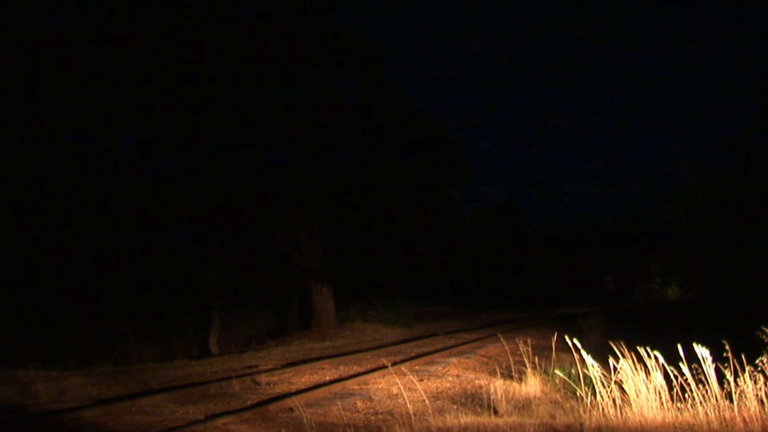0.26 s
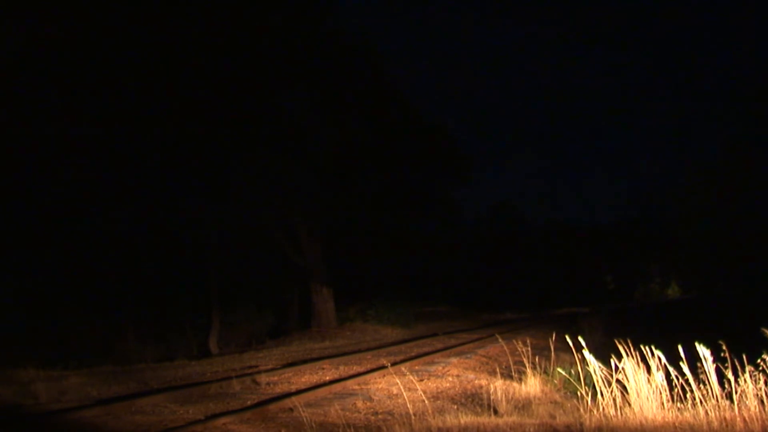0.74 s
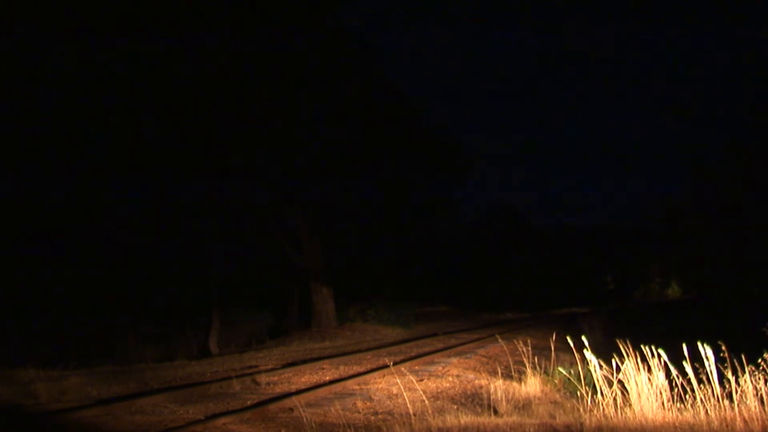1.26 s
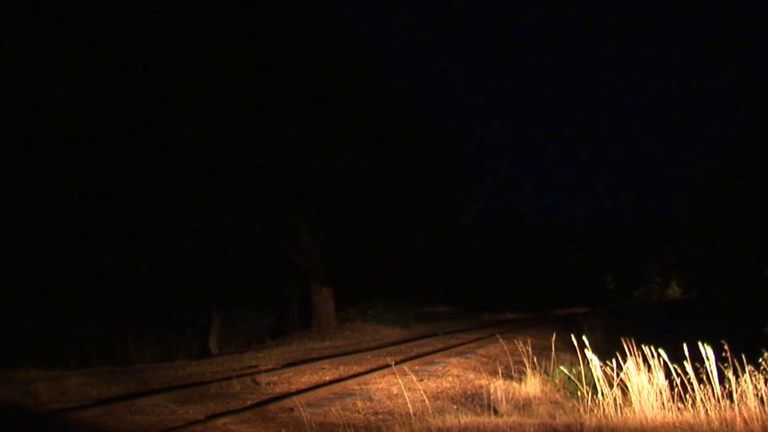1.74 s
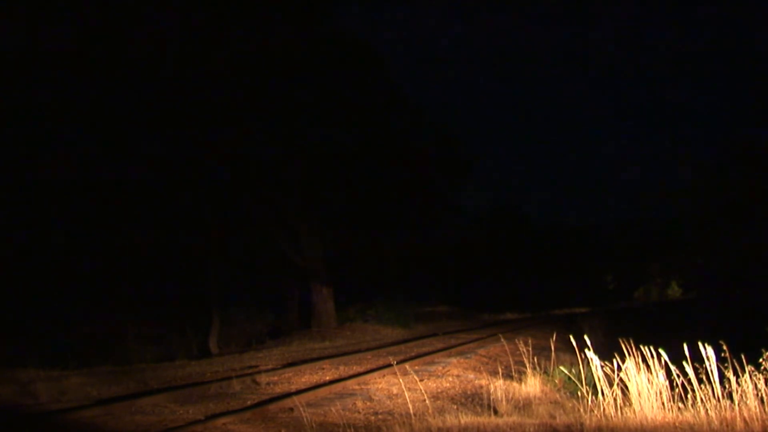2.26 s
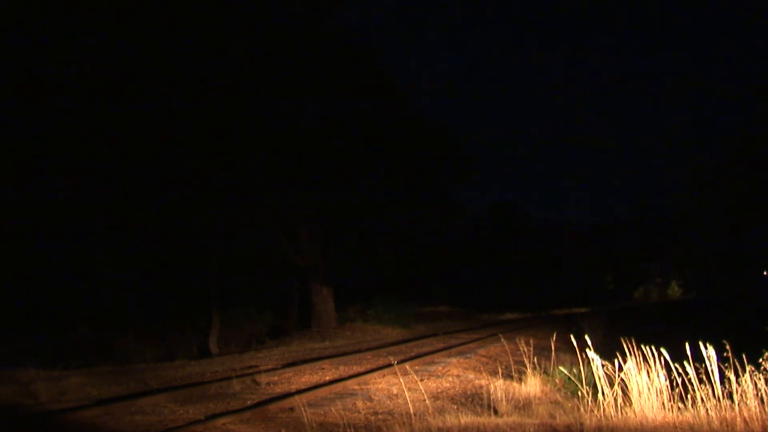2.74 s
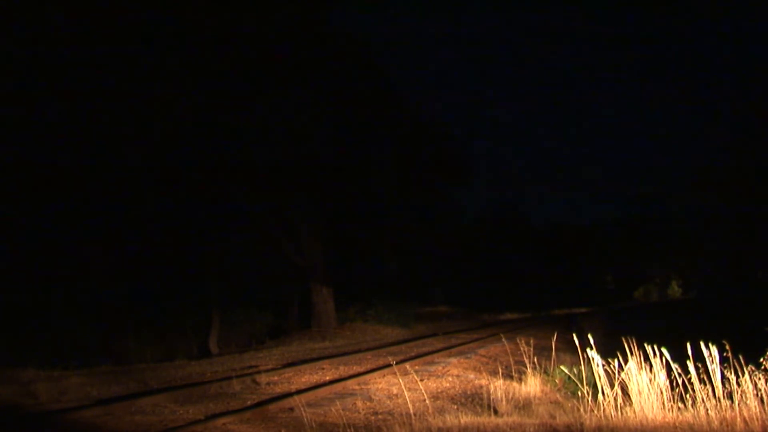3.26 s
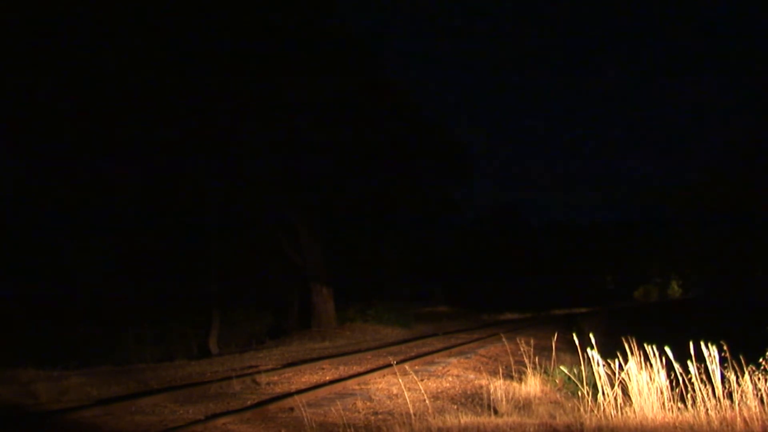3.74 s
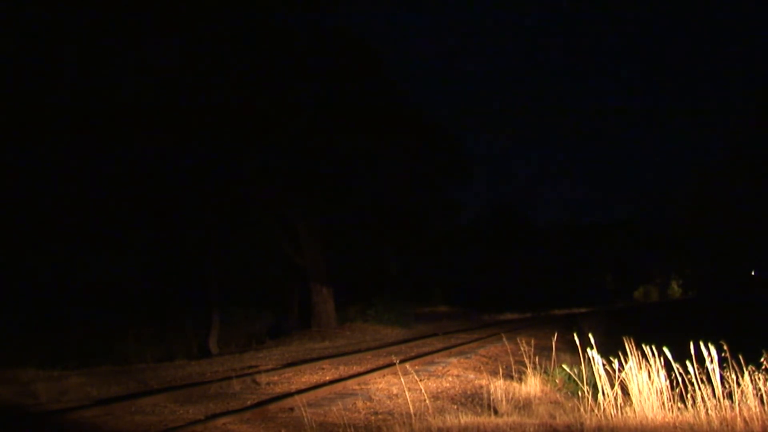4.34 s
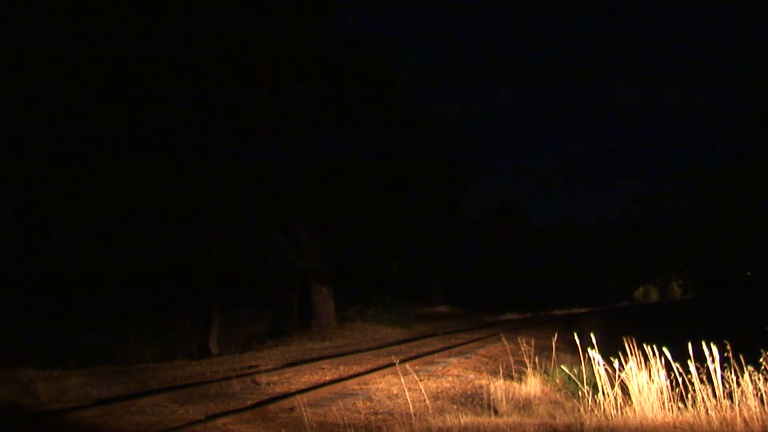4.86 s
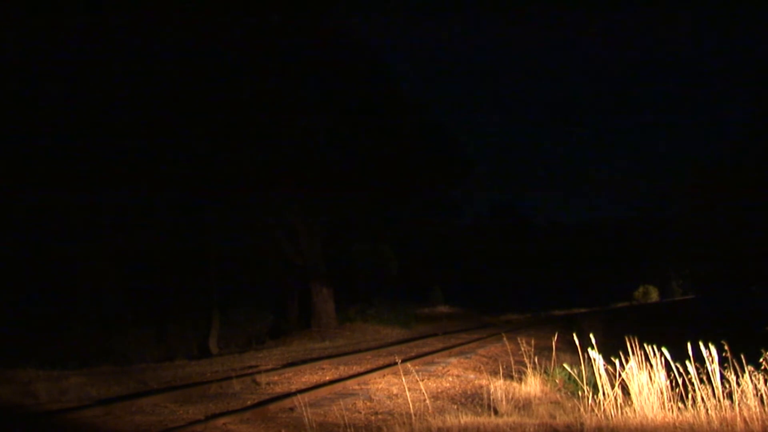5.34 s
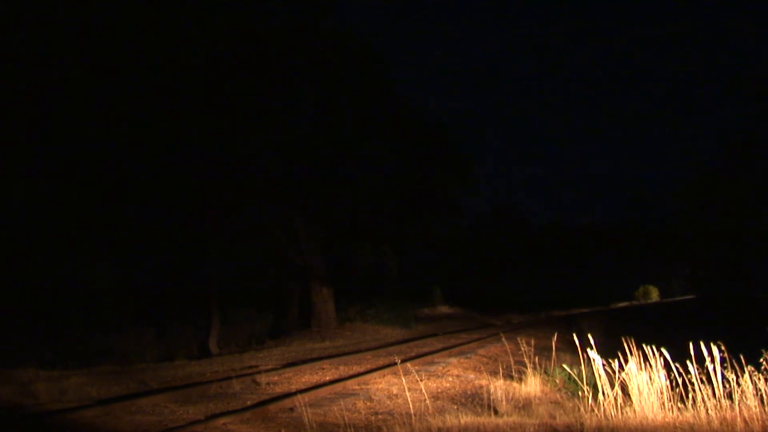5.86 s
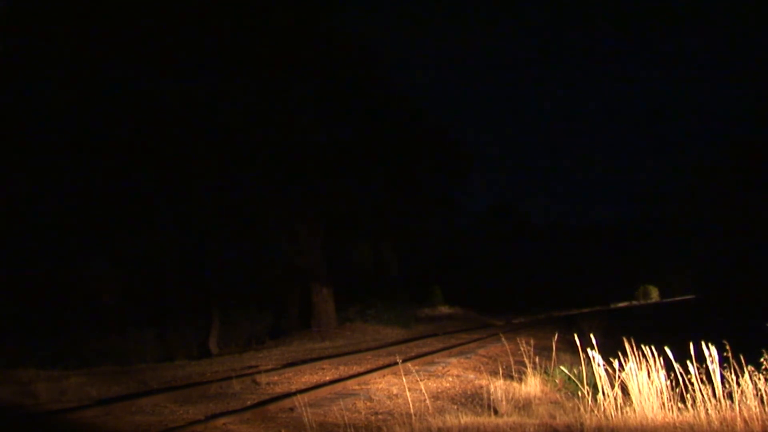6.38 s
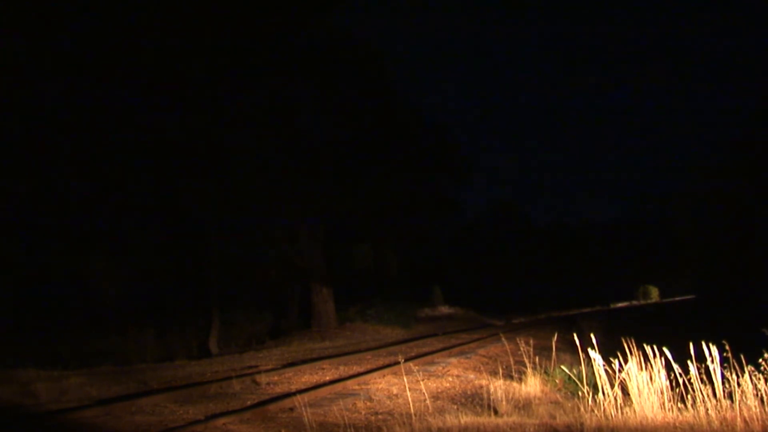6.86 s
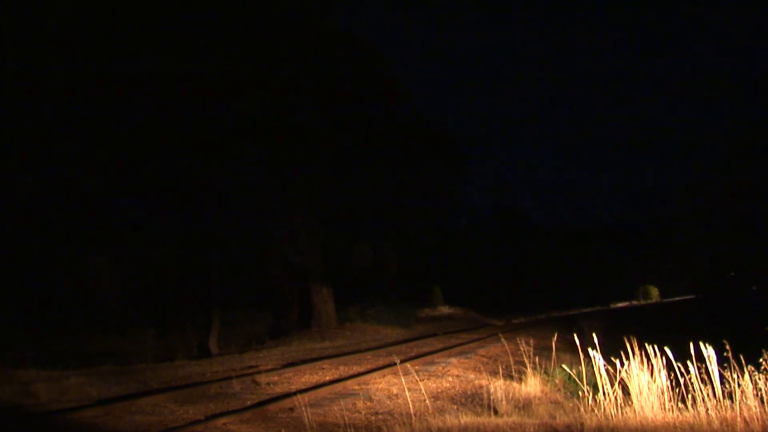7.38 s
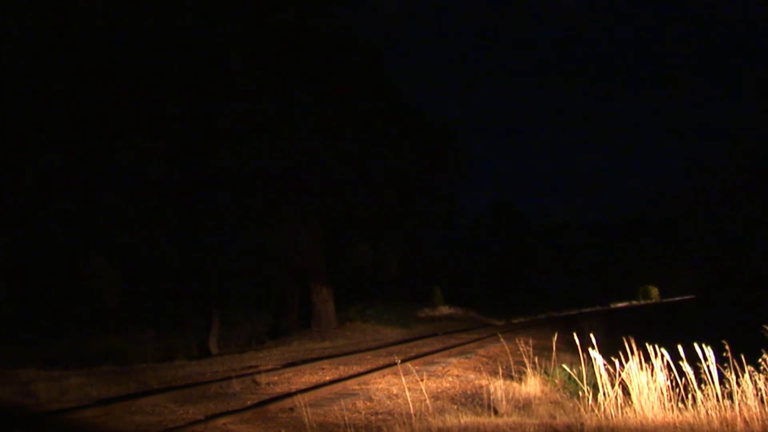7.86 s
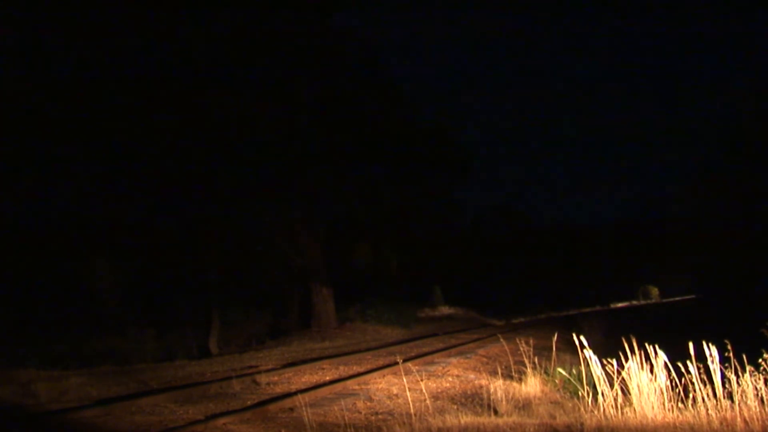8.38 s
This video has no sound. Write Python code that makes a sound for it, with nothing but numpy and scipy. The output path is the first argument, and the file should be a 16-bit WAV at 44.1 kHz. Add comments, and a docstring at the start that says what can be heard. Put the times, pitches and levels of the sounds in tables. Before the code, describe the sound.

Outdoors at night beside a wooded railway, a far diesel engine mutters in a soft, lumpy idle, then climbs in pitch and loudness with breathy, hissing surges. It settles back slightly to a regular throbbing drone, very slowly nearing. A brief, bright three-note horn sounds just before the end, leaving a dull woodland echo. Distant stereo perspective, with tiny dry snaps close by.

```python
"""A low, uneven diesel idle comes first: a locomotive nearing at night through open, wooded country.
Its engine is notched up and settles into a throbbing beat, built of tones locked to the crank,
under shaped noise for the rumble, the exhaust rush and the blower.
Near the end a three-chime air horn, summed from wavering harmonics, gives one short blast,
which rings on among the trees. A few faint ticks fall close to the microphones."""
import sys
import numpy as np
from scipy import signal
from scipy.fft import rfft, irfft, next_fast_len
from scipy.io import wavfile
from scipy.ndimage import uniform_filter1d

SR = 44100
rng = np.random.default_rng(int(sys.argv[2]) if len(sys.argv) > 2 else 0)


def to_wav(s):
    """Save 16-bit WAV."""
    ch = np.atleast_2d(s).T  # columns
    pcm = np.round(np.clip(ch, -1, 1) * 32767)  # PCM
    wavfile.write(sys.argv[1], SR, pcm.astype(np.int16))


N = 380141
TIME = np.arange(N) / SR
FREQS = np.maximum(np.fft.rfftfreq(2 * next_fast_len(N // 2 + 1), 1 / SR), 1)

# relative colour of rushing air, in the blower, its surges and the horn: freq_hz, density_db (per Hz)
AIR_COLOUR = [(900, -28.5), (1500, -7), (2100, 1), (2900, -3.5), (3400, -7.5), (4000, -10), (4500, -23),
              (5000, -17.5), (5400, -27), (6200, -26.5), (8000, -49)]

# the horn's valve opens, stays open briefly and shuts
BLAST_S, HOLD_S = 7.977, 0.291


def from_db(db):
    """Decibels to gain."""
    return 10 ** (np.asarray(db) / 20)


def rms_one(x):
    """Scale to unit power."""
    return x / np.sqrt(np.mean(x ** 2) + 1e-20)


def colour(points):
    """A spectrum table at every frequency, interpolated along log frequency."""
    hz, value = np.transpose(points)
    return np.interp(np.log(FREQS), np.log(hz), value)


def hump(hz, width_hz):
    """Gain of a resonance with steep skirts; its width is taken 3 dB down."""
    detuning = (FREQS ** 2 - hz ** 2) / (FREQS * width_hz * 1.55)
    return 1 / (1 + detuning ** 2)


def band(x, low_hz, high_hz):
    """Keep only one band of a sound."""
    return signal.sosfilt(signal.butter(2, [low_hz, high_hz], "band", fs=SR, output="sos"), x)


def dulled(x, cut_hz):
    """Gently take off the treble."""
    return signal.sosfilt(signal.butter(1, cut_hz, fs=SR, output="sos"), x)


def drift(rate_hz):
    """Slow chance of spread 1: noise through two equal poles, drawn every 100 samples."""
    r = np.exp(-200 * np.pi * rate_hz / SR)
    draws = rng.standard_normal(N // 100 + 1002)
    slow = signal.lfilter([1], [1, -2 * r, r * r], draws)[1000:]   # drop the filter's start
    return np.interp(np.arange(N) / 100, np.arange(len(slow)), rms_one(slow))


def far_noise(gain):
    """Stereo noise of a given colour; scattering makes the sides partly unlike."""
    # how alike left and right are: freq_hz, likeness (0 to 1)
    side_likeness = [(60, 0.95), (110, 1), (210, 0.96), (380, 0.99), (710, 0.87), (1310, 0.65), (2440, 1),
                     (4520, 0.9)]
    mid, side = rng.standard_normal((2, len(FREQS))) + 1j * rng.standard_normal((2, len(FREQS)))
    alike = np.clip(colour(side_likeness), 0, .995)
    pair = np.sqrt(1 + alike) * mid + np.sqrt(1 - alike) * side * [[1], [-1]]
    return rms_one(irfft(pair * gain)[:, :N])


def engine():
    """Crank-locked beat, rumble, and gas noise that puffs with each of three firings a turn."""
    # it hunts at idle, climbs evenly, overshoots and settles: time_s, crank_turns_per_s
    crank_speed = [(0, 8.672), (.596, 8.792), (1.659, 8.436), (2.048, 8.662), (3.544, 11.156),
                   (4.014, 11.339), (4.871, 10.826)]
    turns_per_s = np.interp(TIME, *np.transpose(crank_speed))
    crank = np.cumsum(turns_per_s) / SR + .457
    load = np.clip((turns_per_s - 9.2) / 1.82, 0, 1)   # 0 at idle, 1 at full load
    speeding = uniform_filter1d(np.gradient(turns_per_s) * SR, size=SR // 2)   # turns/s gained each s

    firings = 3 * crank
    puffs = 1 + 0.082 * np.cos(2 * np.pi * firings) + 0.071 * np.cos(4 * np.pi * firings)
    # moving night air makes the distant sound flutter
    rush_flutter = from_db(0.43 * drift(7.7))
    blower_flutter = from_db(0.91 * drift(18.0) + .5 * drift(35))
    rush = (exhaust_rush(load, speeding) + swells()) * rush_flutter
    gas_noise = puffs * (rush + blower() * blower_flutter)
    return thump(crank, load, speeding) + rumble(load) + gas_noise


def follow_effort(cruise_db, share, lag_s, approach_db_per_s):
    """Level in dB of one part of the engine: it follows the effort and grows as the train nears."""
    # how hard the engine works, as the loudness of its gas noise: time_s, effort_db
    effort = [(0.0, -48.5), (0.3, -48.5), (0.55, -51), (1.65, -52.5), (2.1, -47.5), (2.85, -40),
              (3.45, -38), (3.9, -41), (4.3, -43.5), (5.0, -44.0), (5.6, -42.5), (6.5, -42.5), (7.9, -43)]
    s, db = np.transpose(effort)
    swing_db = np.interp(TIME - lag_s, s, db) - -42   # against the effort when cruising
    return cruise_db + share * swing_db + approach_db_per_s * (TIME - TIME.mean())


def thump(crank, load, speeding):
    """The beat hits harder while the engine gains speed and weaker while it coasts."""
    # cruise_db, share of the effort's swing, lag_s (negative leads), approach_db_per_s
    beat_law = (-39.5, 0.34, -0.2, 0.34)
    fuel_db, coast_db = 1.5, 3.0   # dB per turn/s gained or lost each s
    push_db = speeding * np.where(speeding > 0, fuel_db, coast_db)
    beat = exhaust_beat(crank, load, smear=0.0705, waver=0.095)
    return from_db(follow_effort(*beat_law) + push_db) * beat


def exhaust_beat(crank, load, smear, waver):
    """One thump a turn, built of crank orders; the silencer delays the higher ones. Power 1."""
    # exhaust tones: order (rounded for pitch; its fraction only shifts phase), idle_db, load_db (relative)
    crank_tones = [(2, -37.5, -13), (3, -20.5, -28), (4.04, -20.5, -18.5), (5.02, -20, -24), (6, -2.5, 2),
                   (7, -10.5, -26.5), (7.77, -19, -1.5), (9.1, 2, -4), (10.1, -16.5, 1), (11, -16, -45),
                   (13.07, -13.5, -14), (14.65, -21, -12), (17.88, -32, -12.5), (19.34, -33.5, -18),
                   (19.5, -31, -14.5), (22.6, -18, -30)]
    middle_order = crank_tones[6][0]
    wobble = waver * (2 - load)   # idling is less even
    tones, power = 0, 0
    for order, idle_db, load_db in crank_tones:
        gain = from_db(idle_db + load * (load_db - idle_db))
        phase = 2 * np.pi * round(order) * crank - smear * (order - middle_order) ** 2
        in_step = (1 + wobble * drift(6.3)) * np.cos(phase)
        astray = wobble * drift(2.6) * np.sin(phase)
        tones = tones + gain * (in_step + astray)
        power = power + gain ** 2 / 2
    return tones / np.sqrt(power)


def rumble(load):
    """Low noise that swells as the engine works harder, though less than the effort alone would give."""
    # relative colour: freq_hz, density_db (per Hz)
    rumble_colour = [(12, -13), (25, -11.5), (45, -2), (75, 0), (125, -0.5), (180, -9), (250, -16),
                     (320, -23.5), (600, -60)]
    # cruise_db (before the boost below), share of the effort's swing, lag_s (negative leads),
    # approach_db_per_s
    rumble_law = (-46, 0.53, -0.46, 0.34)
    boost_db = 1.5 * (2 - load)
    return from_db(follow_effort(*rumble_law) + boost_db) * far_noise(from_db(colour(rumble_colour)))


def exhaust_rush(load, speeding):
    """Gas noise through the exhaust's resonances, whose balance shifts with load and speeding up."""
    # resonances, levels relative and per root Hz of width:
    # freq_hz, width_hz, idle_db, load_db, pull_db (more while speeding up)
    stack_resonances = [(256, 25, -16, -11.5, 16.5), (407, 86, 3.5, 1, -1.5), (683.5, 73, 1, -6, -0.5),
                        (796, 68, -2, -0.5, 2), (1071, 204, -2.5, -6, -2), (1188, 103, -6.5, -5, -3),
                        (1440, 134, -5.5, -7.5, -0.5), (1712, 84, -3, -4.5, 0.5)]
    # cruise_db, share of the effort's swing, lag_s, approach_db_per_s
    rush_law = (-47, 0.87, 0.4, 0.26)
    pull = np.clip(speeding / 1.37, 0, 1)
    stack, power = 0, 0
    for hz, width_hz, idle_db, load_db, pull_db in stack_resonances:
        level_db = idle_db + load * (load_db - idle_db) + pull * pull_db
        gain = np.sqrt(width_hz) * from_db(level_db)
        stack = stack + gain * far_noise(hump(hz, width_hz))
        power = power + gain ** 2
    return from_db(follow_effort(*rush_law)) * stack / np.sqrt(power)


def swells():
    """The rush sings out at one pitch, as narrow noise that rises and falls."""
    # time_s, length_s, freq_hz, width_hz, peak_db
    swell_events = [(3.0, 0.48, 690, 70, -56), (3.1, 0.6, 2185, 120, -52), (3.146, 0.78, 420, 53.6, -50.5),
                    (3.848, 0.44, 1805, 84.5, -50), (6.505, 0.5, 1180, 99, -55)]
    return sum(from_db(db) * np.exp(-((TIME - s) / length_s) ** 2) * far_noise(hump(hz, width_hz))
               for s, length_s, hz, width_hz, db in swell_events)


def blower():
    """The blower's hiss, rising and falling with the effort."""
    # cruise_db, share of the effort's swing, lag_s (negative leads), approach_db_per_s
    blower_law = (-48, 1.0957, -0.09, 0.17)
    return from_db(follow_effort(*blower_law)) * ducted_hiss(ripple_db=2.5, spacing_hz=39.48)


def ducted_hiss(ripple_db, spacing_hz):
    """Blower noise with many narrow duct resonances, which trade places as the train moves."""
    grid, hiss = np.arange(0, SR / 2, spacing_hz), 0
    for turn in np.linspace(0, np.pi, num=3, endpoint=False):
        ripple = np.interp(FREQS, grid, rng.standard_normal(len(grid)))
        fade = np.cos(0.88 * TIME + turn) ** 2
        hiss = hiss + fade * far_noise(from_db(colour(AIR_COLOUR) + ripple_db * ripple))
    return rms_one(hiss)


def surges():
    """The blower's hiss flares up for a moment now and then, as short bursts of banded noise."""
    # time_s, peak_db
    surge_events = [(2.4, -48), (3.66, -47.5), (6.31, -46.5)]
    length_s = 0.034
    gain = sum(from_db(db) * np.exp(-((TIME - s) / length_s) ** 2) for s, db in surge_events)
    return gain * far_noise(hump(2350, width_hz=1400) * from_db(colour(AIR_COLOUR) / 2))


def horn():
    """Three chimes on one air supply, which couples them into sum tones, with escaping air."""
    # partials of the three chimes: multiple of the pitch, level_db
    low_partials = [(1, -10.5), (2, -2), (3, -8.5), (4, -12.5), (5, -12.5), (6, -19), (7, -18), (8, -23),
                    (9, -32), (10, -52.5), (12, -36.5)]
    middle_partials = [(1, -11), (2, -0.5), (3, -9), (4, -13.5), (5, -10.5), (6, -14.5), (7, -28.5),
                       (8, -39), (9, -34.5), (11, -53.5)]
    high_partials = [(1, -8.5), (2, -3.5), (3, -5), (4, -7.5), (5, -11), (6, -15), (7, -20), (8, -36.5),
                     (9, -29), (11, -41.5)]
    # the upper chimes speak loud, and all three speak round, before the overtones build up
    speak_s, speak_db, speak_dull_db_per_octave = 0.14, 6.5, 4
    speaking = np.exp(-((TIME - BLAST_S) / speak_s) ** 4)
    # partials against the second, dB per octave
    bright_db = -0.44 - speak_dull_db_per_octave * speaking

    manner = dict(bright_db=bright_db, jitter=0.0032, shimmer_db=4.0, dispersion=0.81)
    low_chime = chime(425.0, low_partials, **manner)
    middle_chime = chime(544.3, middle_partials, **manner)
    high_chime = chime(562.3, high_partials, **manner)
    low = from_db(-19.5) * valve(attack_s=0.077) * low_chime
    upper_gain = from_db(-22.5 + speak_db * speaking) * valve(attack_s=0.048)
    upper = upper_gain * (middle_chime + from_db(-3.5) * high_chime)

    sum_tones = band(low * upper, 900, 2100)
    # at full pressure the waves steepen and a dense rasp fills the treble
    rasp = band((low + upper) ** 2, 2700, 4100)
    air = from_db(-14) * upper_gain * far_noise(from_db(colour(AIR_COLOUR)))[0]
    return low + upper + from_db(-0.5) * sum_tones + from_db(2.5) * rasp + air


def chime(hz, partials, bright_db, jitter, shimmer_db, dispersion):
    """A buzzing diaphragm in a flared bell: harmonics that start a little sharp, waver and sag."""
    blowing = TIME > BLAST_S
    t = TIME[blowing] - BLAST_S
    # shares of the pitch: sharp at first, settling, then sagging as the air runs out
    sharp, settle_s, sag_per_s = .02, 0.0494, .075
    bend = sharp * np.exp(-t / settle_s) - sag_per_s * np.maximum(t - HOLD_S, 0)
    cycles = np.cumsum(hz * (1 + bend + jitter * drift(25)[blowing])) / SR
    orders, levels_db = np.transpose(partials)
    tone = np.zeros(N)
    for k in range(1, round(orders[-1]) + 1):
        level_db = np.interp(k, orders, levels_db)   # bridges multiples the table skips
        tilt_db = bright_db[blowing] * np.abs(np.log2(k / 2))
        waver_db = shimmer_db * drift(11.0)[blowing]
        wave = np.sin(2 * np.pi * k * cycles + dispersion * k ** 2)
        tone[blowing] += from_db(level_db + tilt_db + waver_db) * wave
    return np.sqrt(2) * tone


def valve(attack_s):
    """Gain of a chime: it builds up when the valve opens, droops, and dies when the valve shuts."""
    # after a short time at full pressure the air line droops; the release adds to the droop
    full_s, droop_db_per_s, release_db_per_s = 0.13, 29.5, 97
    t = np.maximum(TIME - BLAST_S, 0)
    droop_db = droop_db_per_s * np.maximum(t - full_s, 0)
    release_db = release_db_per_s * np.maximum(t - HOLD_S, 0)
    return (1 - np.exp(-(t / attack_s) ** 2)) * from_db(-droop_db - release_db)


def tree_lines(x):
    """A few distinct, dull echoes from the edges of the wood."""
    # delay_s, level_db
    wood_edges = [(.125, -16.5), (.33, -22)]
    dull = dulled(x, cut_hz=4800)
    return sum(from_db(db) * np.interp(TIME - delay_s, TIME, dull) for delay_s, db in wood_edges)


def woods(x, t60_s, build_s, shared, dull_hz):
    """Countless weak echoes from trunks and foliage, dull and partly common to both sides."""
    t = TIME[:2 * SR]
    echoes = rng.standard_normal((2, len(t))) + shared * rng.standard_normal(len(t))
    echoes = echoes * from_db(-60 * t / t60_s) * (1 - np.exp(-(t / build_s) ** 2))
    echoes = echoes / np.sqrt(np.sum(echoes ** 2) / 2)
    return signal.fftconvolve(dulled(x, dull_hz)[None], echoes, axes=1)[:, :N]


def microphones(pair):
    """The locomotive is to the right: the left side hears it mostly later and weaker."""
    # left against right: freq_hz, left_minus_right_db
    side_level = [(60, 0.5), (200, 1), (410, 0), (660, -2.5), (1070, -3.5), (1650, -5), (2200, -1.5),
                  (2800, 0), (4500, 1)]
    # left against right: freq_hz, left_lead_rad
    side_lead = [(60, 0), (200, 0.03), (430, -0.7), (860, -1), (1290, 0.4), (1640, 0.5), (2200, 0.17),
                 (2600, 0.54), (3600, 0.03), (3960, -1.53), (4400, -0.95), (7000, -3.5)]
    # half of each difference goes to either side
    shade = from_db(colour(side_level) / 2) * np.exp(.5j * colour(side_lead))
    spectra = rfft(pair, 2 * (len(FREQS) - 1))
    return irfft(spectra * np.array([shade, 1 / shade]))[:, :N]


def ticks(decay_s):
    """Tiny dry snaps close to the microphones: noise that dies at once, without its bass."""
    # time_s, peak_db (nominal; the envelope starts 7 dB lower, as noise peaks above it)
    tick_events = [(2.205, -64), (4.452, -65), (4.65, -49.5), (6.571, -59)]
    envelope = sum(from_db(db - 7) * (TIME >= s) * np.exp(-np.abs(TIME - s) / decay_s)
                   for s, db in tick_events)
    high_pass = signal.butter(1, 1800, "high", fs=SR, output="sos")
    return signal.sosfilt(high_pass, envelope * rng.standard_normal((2, N)))


def scene():
    """Engine, horn and its echoes, and a few ticks nearby."""
    blast = horn()
    ringing = woods(blast, t60_s=2.1, build_s=0.092, shared=1.1, dull_hz=850)
    echoes = tree_lines(blast) + from_db(-7.5) * ringing
    return microphones(engine() + surges() + blast + echoes) + ticks(decay_s=0.013)


def record(dry):
    """Faint amplifier hiss; a steep filter cuts the top, 60 dB down from 14734 Hz."""
    hiss = from_db(-75.5) * rng.standard_normal((2, N))
    return signal.sosfilt(signal.cheby2(14, 60, 14734, fs=SR, output="sos"), dry + hiss)


dry = scene()
out = record(dry)
to_wav(out)
```